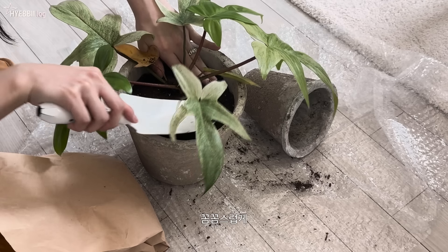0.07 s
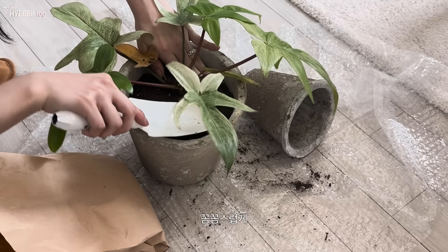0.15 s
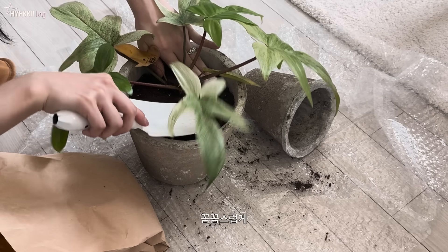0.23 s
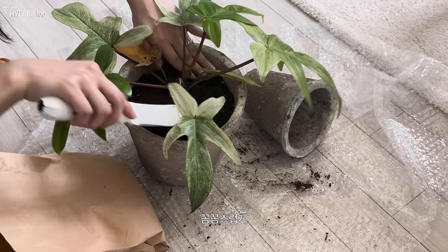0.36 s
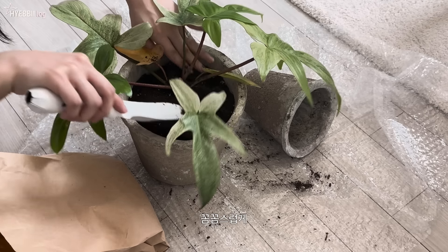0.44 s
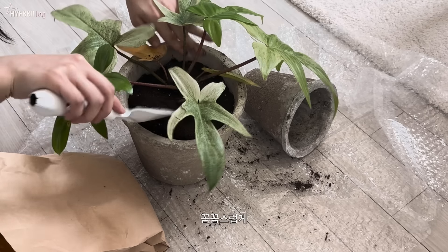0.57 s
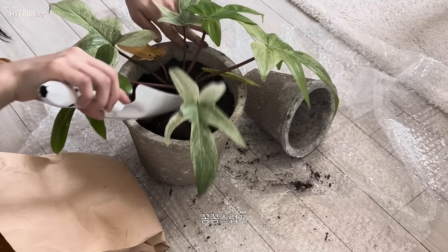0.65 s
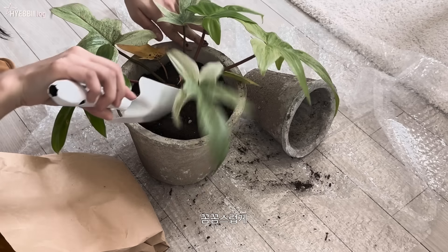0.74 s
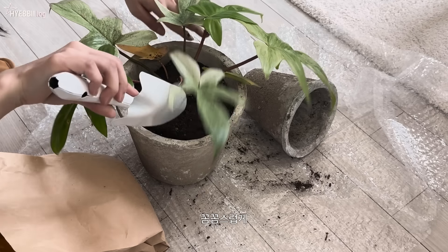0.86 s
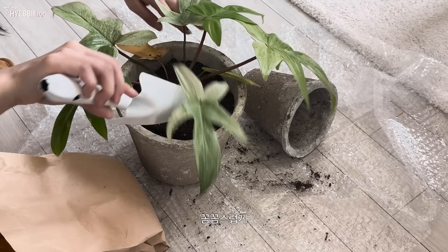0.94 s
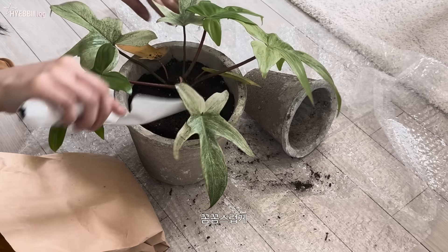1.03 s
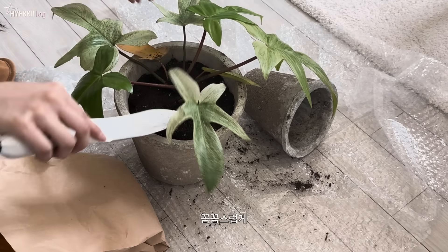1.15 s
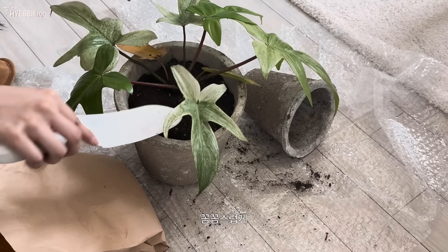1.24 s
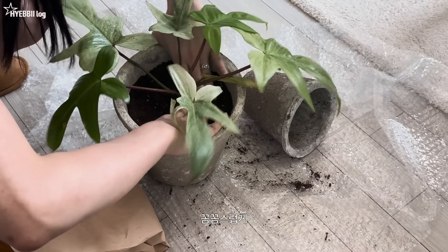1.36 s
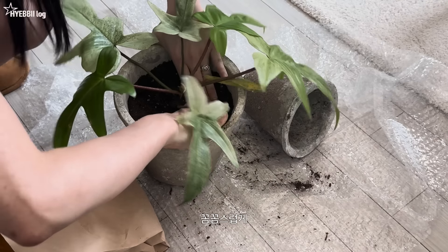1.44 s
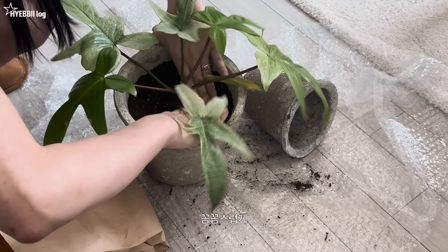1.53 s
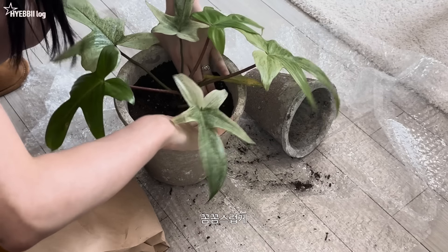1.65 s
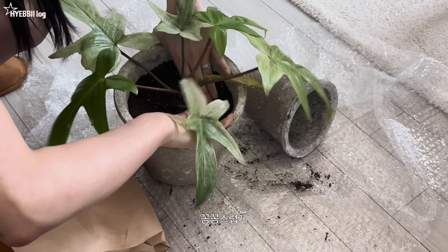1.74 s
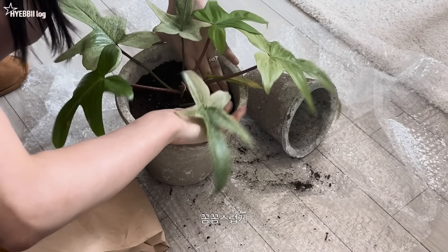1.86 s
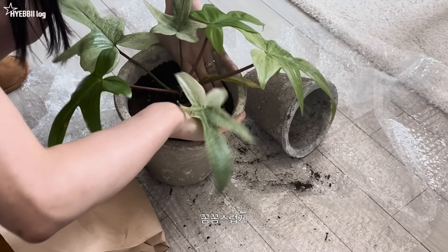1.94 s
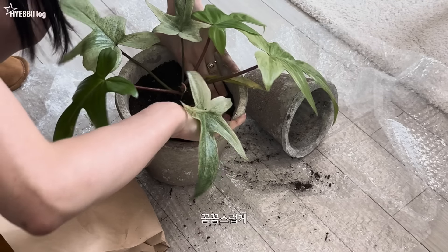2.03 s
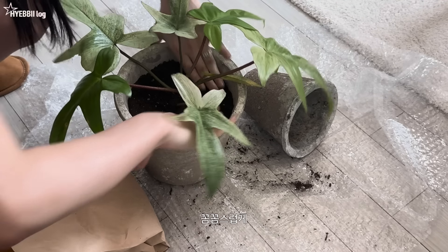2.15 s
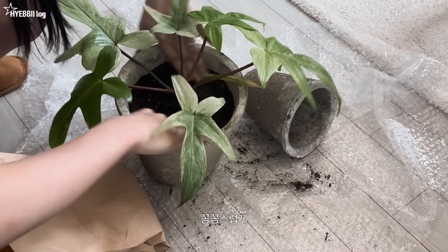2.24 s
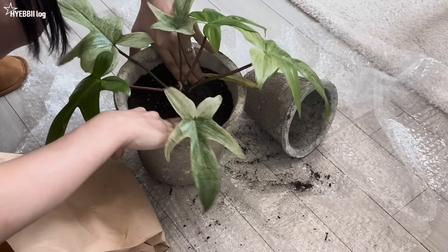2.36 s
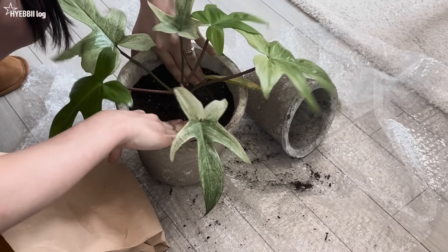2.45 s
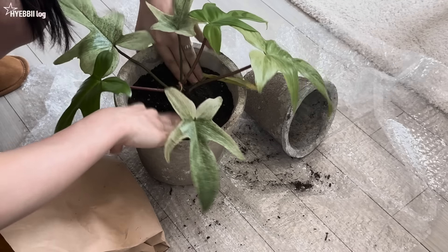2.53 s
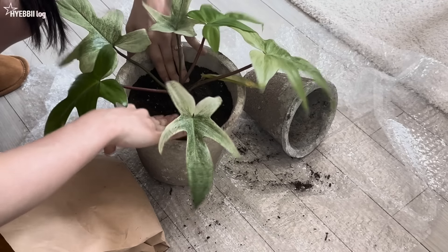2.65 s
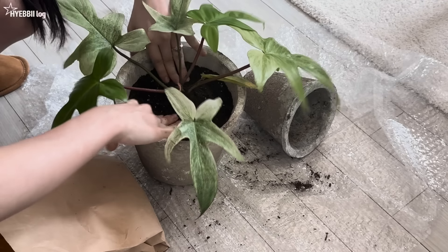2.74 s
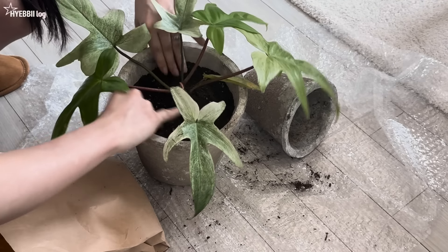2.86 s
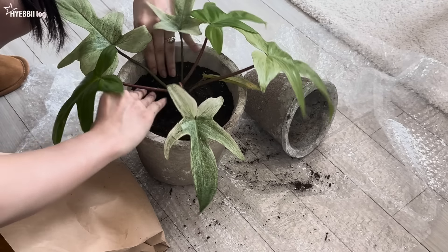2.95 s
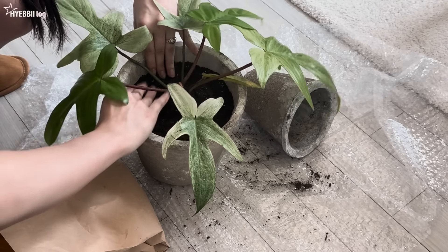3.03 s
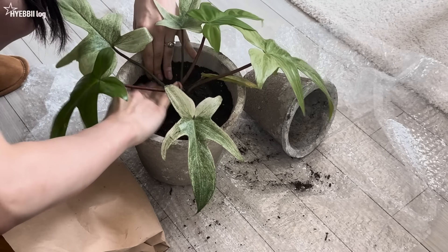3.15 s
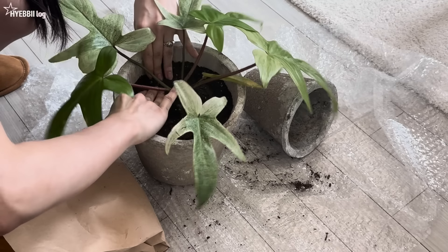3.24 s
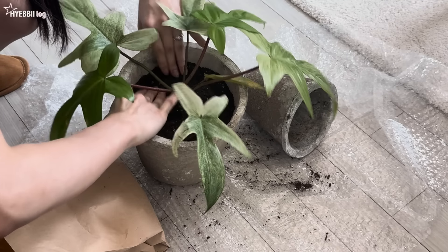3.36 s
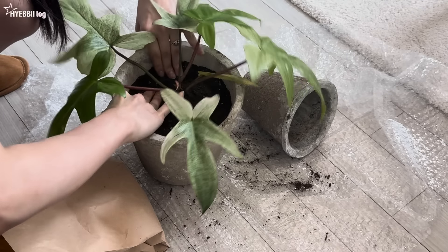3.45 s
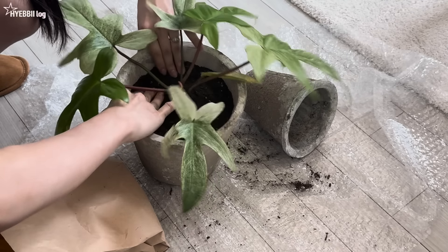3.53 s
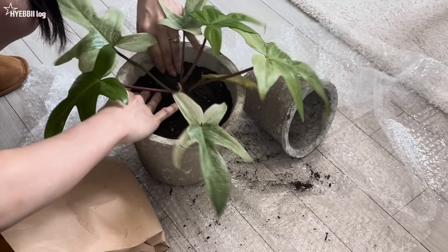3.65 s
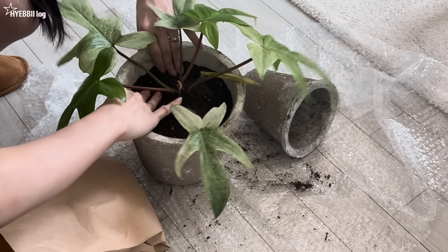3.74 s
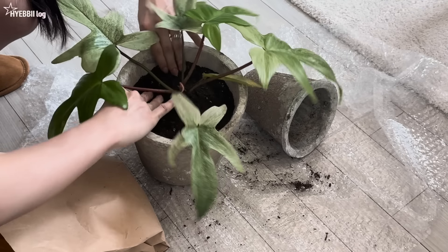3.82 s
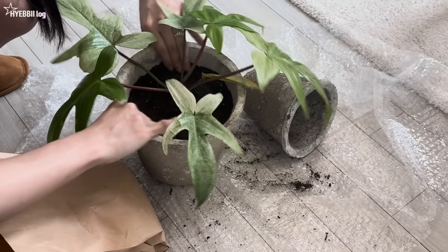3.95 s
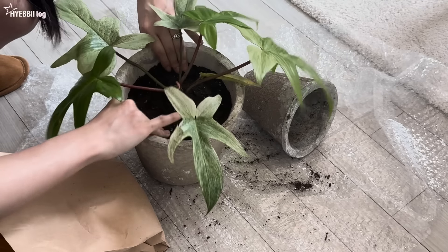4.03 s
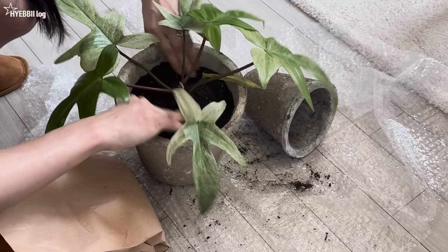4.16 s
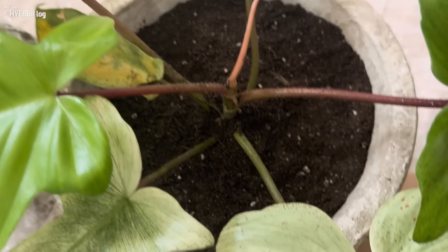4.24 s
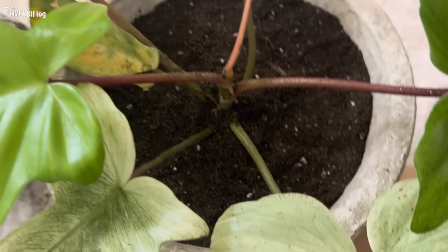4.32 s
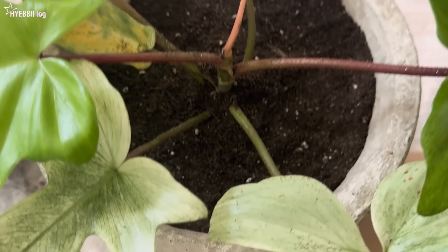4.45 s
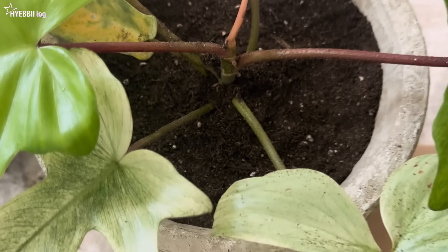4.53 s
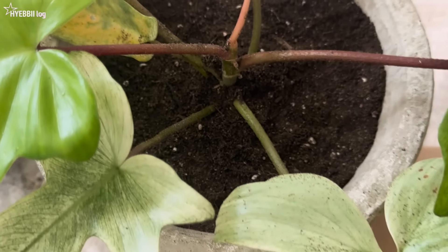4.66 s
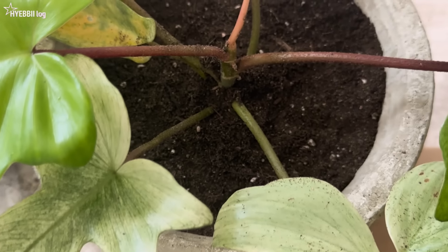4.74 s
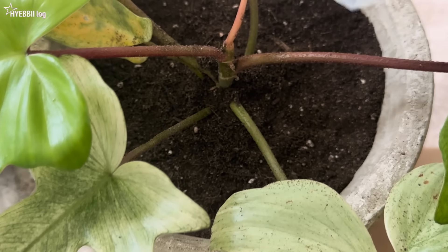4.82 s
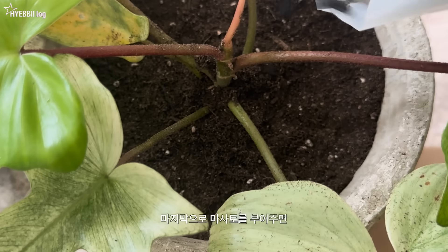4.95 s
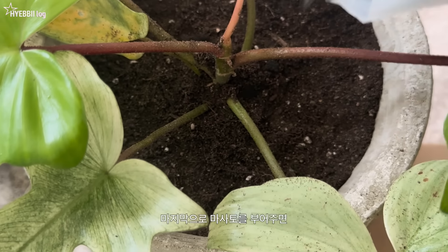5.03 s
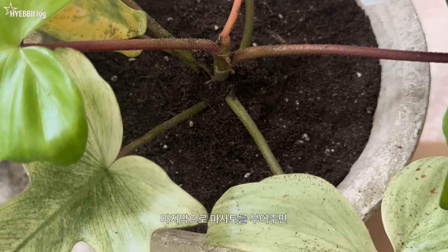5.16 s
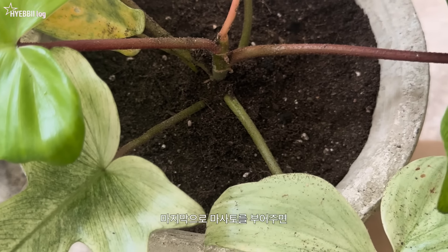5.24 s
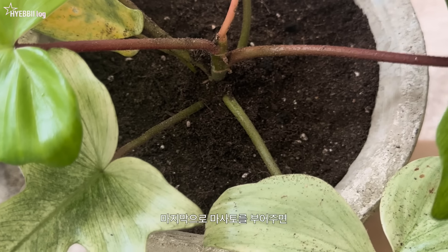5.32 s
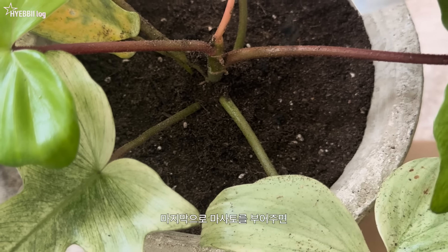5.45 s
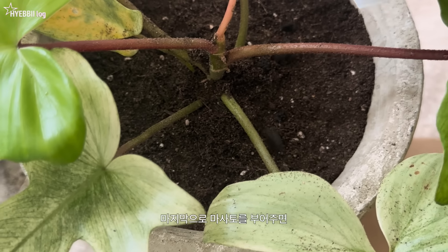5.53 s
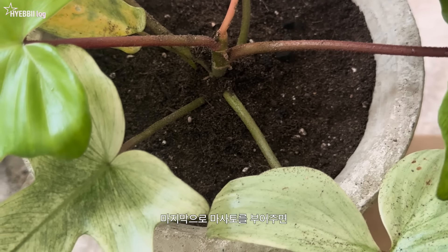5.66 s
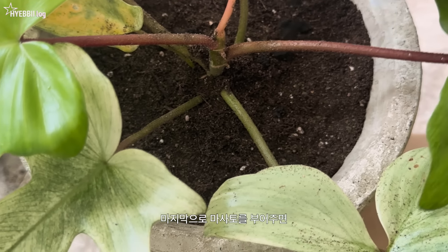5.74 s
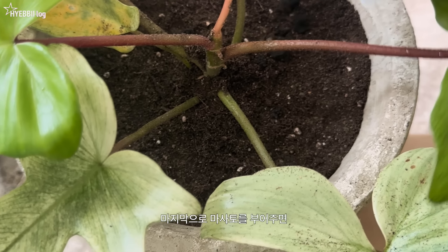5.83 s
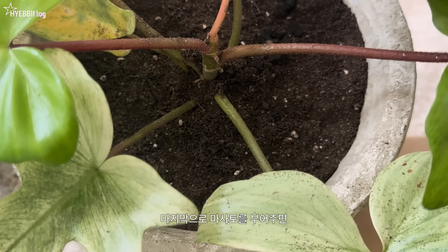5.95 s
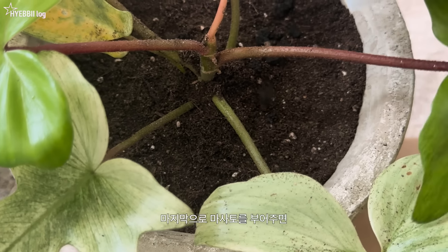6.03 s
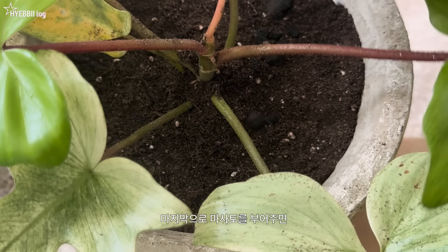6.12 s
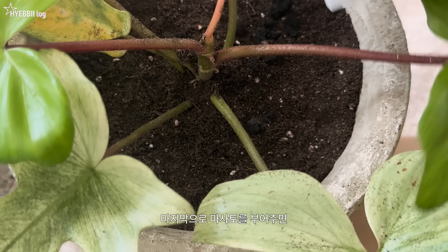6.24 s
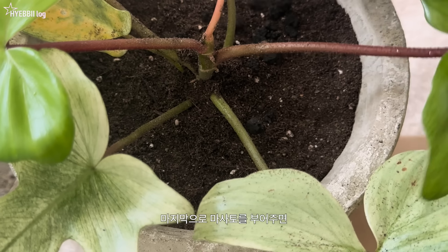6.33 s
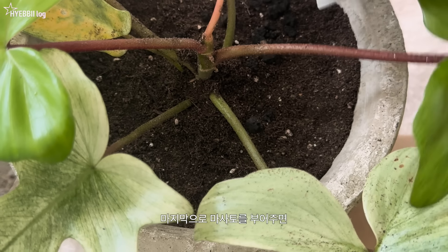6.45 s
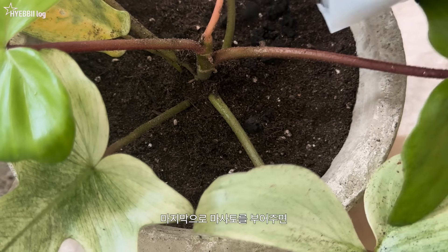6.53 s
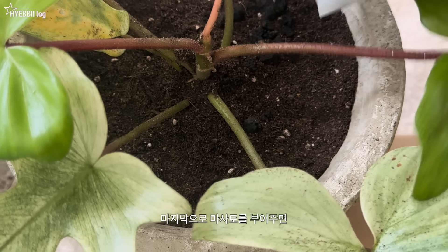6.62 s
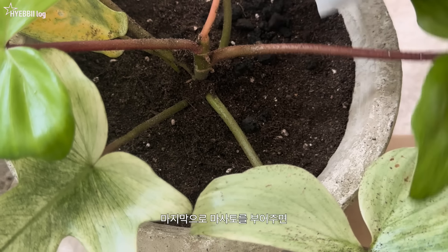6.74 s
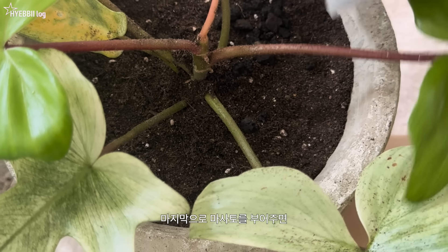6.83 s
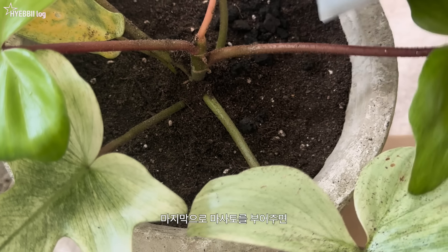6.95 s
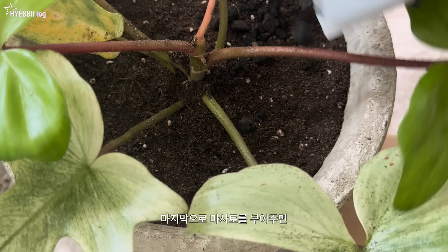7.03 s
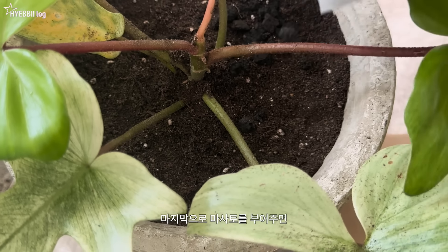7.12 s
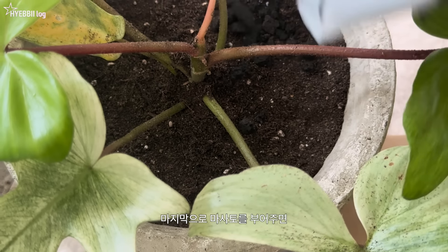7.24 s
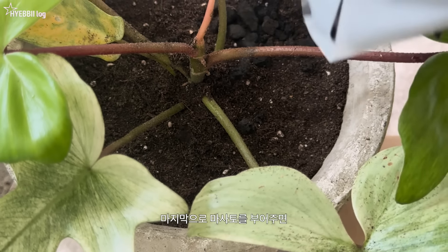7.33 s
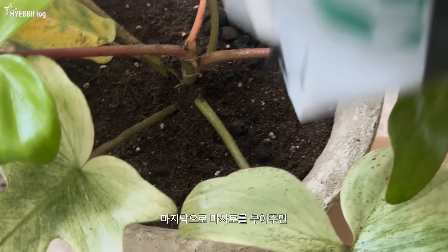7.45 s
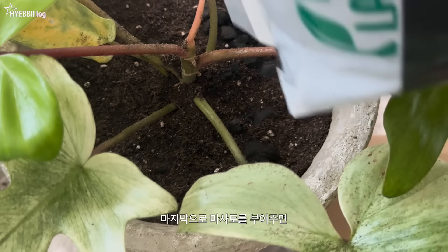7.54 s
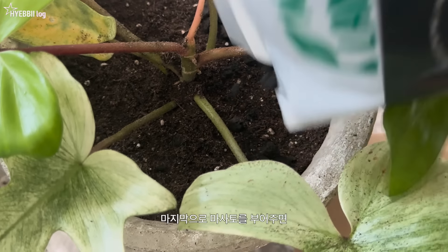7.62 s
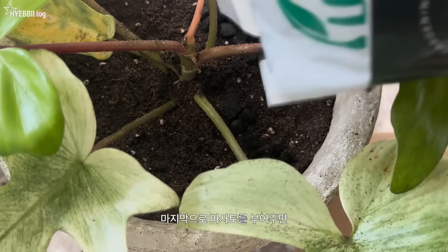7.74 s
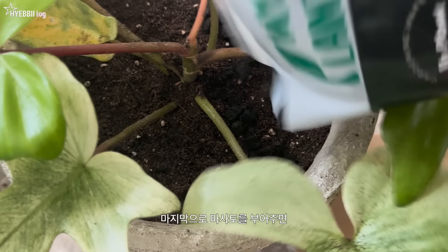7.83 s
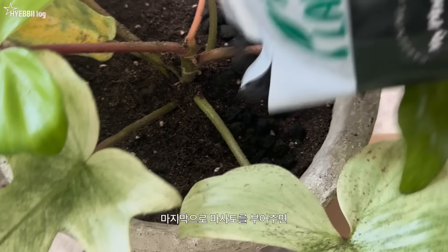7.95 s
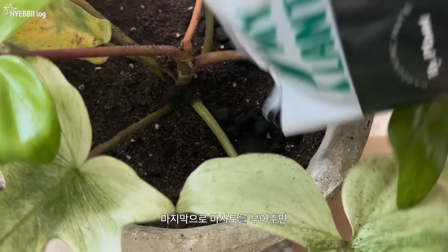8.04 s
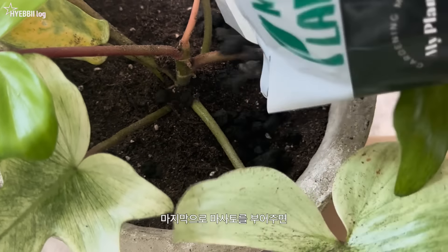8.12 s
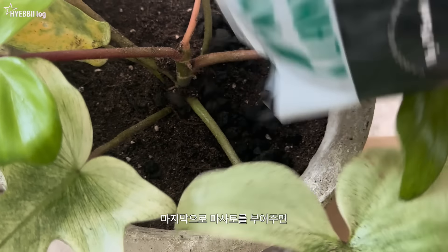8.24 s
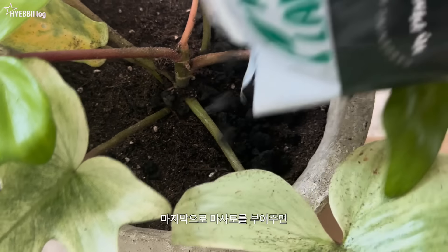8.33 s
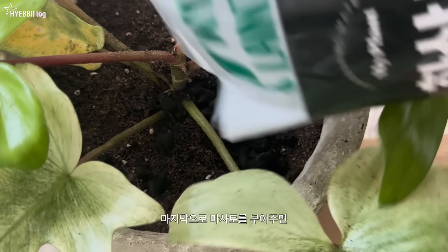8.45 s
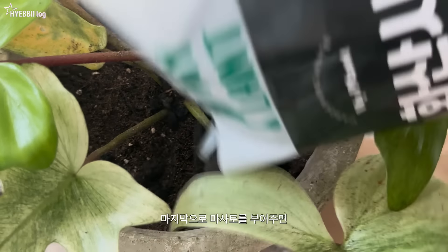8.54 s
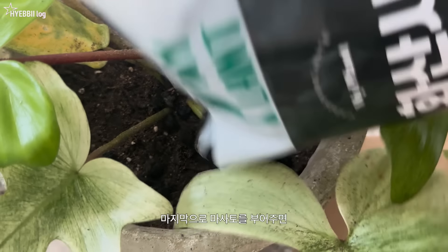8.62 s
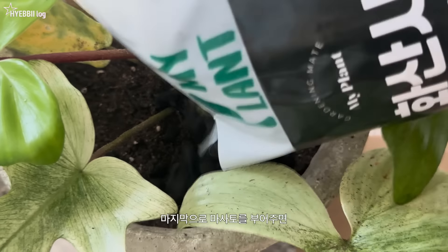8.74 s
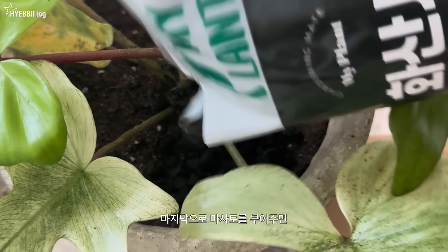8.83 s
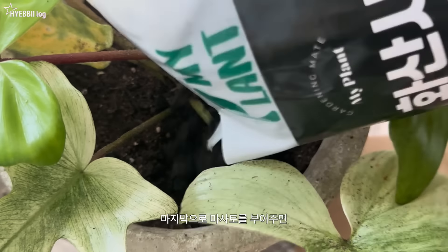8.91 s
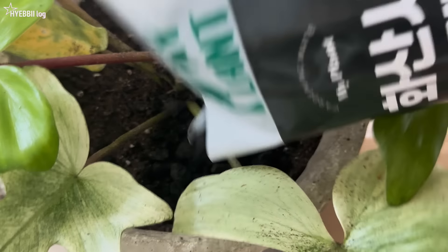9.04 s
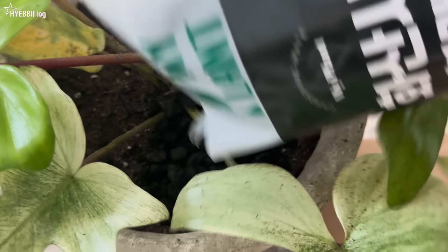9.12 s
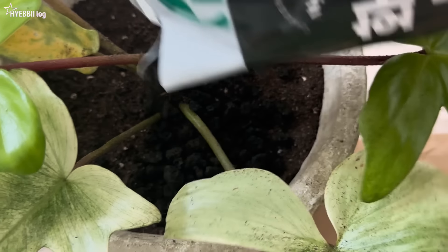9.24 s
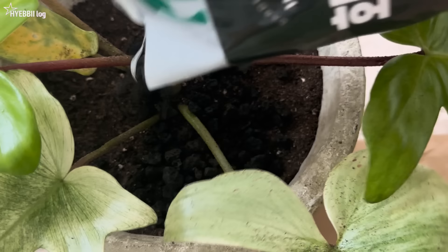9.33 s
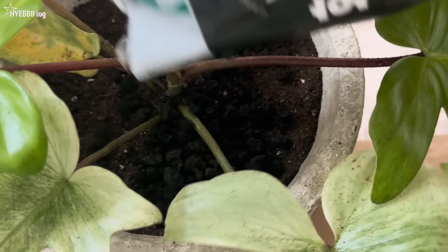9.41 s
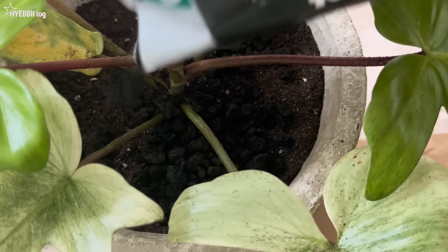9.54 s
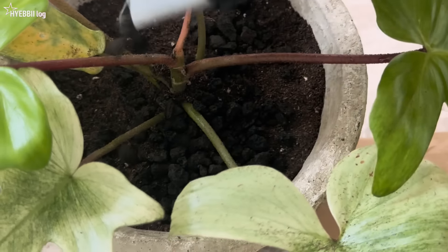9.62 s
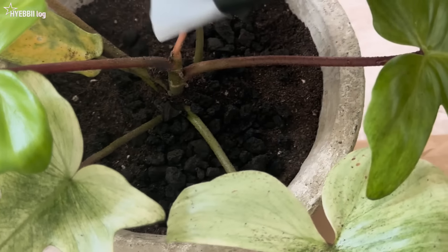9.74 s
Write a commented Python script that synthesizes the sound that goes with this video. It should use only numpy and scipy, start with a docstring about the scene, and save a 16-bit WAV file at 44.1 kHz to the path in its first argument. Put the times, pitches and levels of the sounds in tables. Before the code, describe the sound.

Soil scrapes faintly off a singing metal scoop, fingers press and crackle it, then grit pours from a bag in dense rattling gushes over low hum.

```python
"""Repotting on the floor

Indoors, close to a phone, soil slides off a steel scoop and makes it sing; fingers press it down in a stone pot.
Then grit is shaken from a plastic bag: many small grains patter, boom and hiss in gushes, and big ones knock.
Short bright bursts of noise break out within the pouring, and the pot rings and thuds.
A fan hums as wavering tones over a murmur of air. The two microphone ports hear the treble out of step."""
import sys
import numpy as np
from scipy import signal
from scipy.fft import rfft, irfft, next_fast_len
from scipy.io import wavfile
from scipy.ndimage import uniform_filter1d, map_coordinates

SR = 44100
rng = np.random.default_rng(int(sys.argv[2]) if len(sys.argv) > 2 else 0)


def unload_wav(signal):
    """Save mono or channel-first audio to the path in sys.argv[1] as 16-bit WAV at rate SR, clipped to [-1, 1]."""
    wavfile.write(
        sys.argv[1],
        SR,
        np.round(np.clip(np.atleast_2d(signal).T, -1, 1) * 32767).astype(np.int16),
    )


N = 431298


def amp(db):
    """Turn dB into a plain factor."""
    return 10 ** (np.asarray(db) / 20)


def unit(x):
    """Scale x to rms 1."""
    return x / np.sqrt(np.mean(x ** 2) + 1e-20)


def along(points, hz):
    """Read a curve of (f/Hz, value) points, with frequency on a log axis."""
    f, v = np.transpose(points)
    return np.interp(np.log(hz + 1), np.log(f + 1), v)


def curves(rows):
    """A gate that is open inside the table's time span, then one value per sample for each column."""
    s, *columns = np.transpose(rows)
    t = np.arange(N) / SR
    inside = 1.0 * ((t >= s[0]) & (t <= s[-1]))
    gate = uniform_filter1d(inside, size=300)
    return [gate] + [np.interp(t, s, column) for column in columns]


def wobble(rate):
    """A smooth random curve through `rate` random points a second."""
    points = rng.standard_normal(int(N * rate / SR) + 4)
    return map_coordinates(points, [np.arange(N) * rate / SR])


def swells(rows, fall):
    """Power of smooth bumps (peak t/s, length/s at half amplitude, level/dB); each falls `fall` times as long as it rises."""
    t = np.arange(0, N, 64) / SR
    s, length, db = np.array(list(rows)).T[:, :, None]
    u = (t - s) / length * (1 + fall) * np.where(t > s, 1 / fall, 1)
    power = amp(2 * db - 12 * u ** 2).sum(axis=0)
    return np.interp(np.arange(N) / SR, t, power)


def filtered(x, response):
    """Multiply the spectrum of x by a response, a function of frequency."""
    m = next_fast_len(N + SR // 2)
    return irfft(rfft(x, m) * response(np.fft.rfftfreq(m, 1 / SR)), m)[..., :N]


def coloured(x, spectrum):
    """x shaped by (f/Hz, level/dB) points, then set to rms 1."""
    return unit(filtered(x, lambda hz: amp(along(spectrum, hz))))


def modes(x, table):
    """Pass x through resonances (f/Hz, width/Hz, level/dB) that add up with alternating sign."""
    def response(f):
        total = 0
        for k, (centre, width, db) in enumerate(table):
            damping = 1j * f * width
            total = total + (-1) ** k * amp(db) * damping / (centre * centre - f * f + damping)
        return total
    return filtered(x, response)


def grains(start, end, lo_hz, hi_hz, cycles, spread_db, smooth, count, size):
    """Many tiny damped waves of random pitch and strength, mixed with a share `smooth` of steady noise."""
    when, pitch, big, sign = rng.random((count, 4)).T[:, :, None]
    hz = lo_hz * (hi_hz / lo_hz) ** pitch
    n = np.arange(size)
    # A wave has lost 30 dB after `cycles` cycles; the factor hz keeps the spectrum flat.
    strength = hz * amp(-spread_db * np.log(1.002 - big) - 30 * n * hz / SR / cycles)
    wave = strength * np.sign(sign - .5) * np.sin(2 * np.pi * hz * n / SR)
    at = ((start + (end - start) * when) * SR).astype(int) + n
    rain = np.bincount(at.ravel(), wave.ravel(), N + SR)[:N]
    share = np.clip(smooth, 0, 1)
    separate = unit(rain) * np.sqrt((end - start) * SR / N * (1 - share))
    return separate + np.sqrt(share) * rng.standard_normal(N)


def add_at(track, s, sound):
    """Add a short sound to the track from time s on."""
    track[round(s * SR):][:len(sound)] += sound


def knocks(rows, partials, cycles, body_db, crack_db, crack_t60, crack_hz):
    """Each row is a short dead ring at its pitch, with a dull crack of noise on its front."""
    bodies, cracks, t = np.zeros(N + SR), np.zeros(N + SR), np.arange(2000) / SR
    for s, db, hz, rel_db in rows:
        ring = sum(amp(level) * np.sin(2 * np.pi * k * hz * t) for k, level in partials)
        fade = amp(db + body_db - 30 * t * hz / cycles)
        onset = 1 - np.exp(-3 * t * hz)
        add_at(bodies, s, fade * onset * ring)
        crack_fade = amp(db + rel_db + crack_db - 60 * t / crack_t60)
        add_at(cracks, s, crack_fade * rng.standard_normal(len(t)))
    return bodies[:N] + filtered(cracks[:N], lambda hz: 1 / (1 + 1j * hz / crack_hz) ** 2)


def ports(x, alike, size):
    """What both ports share, plus an unshared part whose phases are scrambled by scattering."""
    z = signal.stft(x, nperseg=size)[2]
    scrambled = z * np.exp(2j * np.pi * rng.random(z.shape))
    other = signal.istft(scrambled, nperseg=size)[1][:N]
    other = unit(other) * np.std(x)

    def shares(hz):
        turn = np.arccos(np.clip(along(alike, hz), 0, 1)) / 2
        return np.array([np.cos(turn), np.sin(turn)])
    mid, side = filtered(np.array([x, other]), shares)
    return np.array([mid + side, mid - side])


# Level of the hum, with its random wavering: t/s, level/dB
HUM_LEVEL = [(0.0, -31.5), (0.63, -32.5), (1.03, -29), (1.36, -32.5), (2.37, -34), (2.56, -32.5),
             (4.03, -34), (4.22, -31), (4.9, -28), (5.01, -31), (6.32, -28.5), (6.62, -31.5), (7.9, -28),
             (8.04, -24.5), (8.85, -29), (9.04, -36), (9.53, -26), (9.78, -29)]
# Fan and duct tones: f/Hz, wander/Hz, level/dB relative to the hum's level
HUM_TONES = [(61.5, 1.6, 1.5), (148.5, 1.2, -6.5), (369.7, 4, -15), (918, 12, -26)]
# Colour of the air's murmur: f/Hz, level/dB
AIR_COLOUR = [(30, -46), (50, 0), (100, -8), (200, -14.5), (400, -19), (700, -24), (1100, -24.5),
              (1600, -32), (2500, -47.5), (5000, -61), (9000, -49), (12000, -60), (16000, -64)]
LOUDER_S = 4.25  # from here on the air is louder


def room():
    """Wavering fan and duct tones and a low rumble over the murmur of air, which is louder from LOUDER_S on."""
    _, hum_db = curves(HUM_LEVEL)
    tones = 0
    for hz, wander, db in HUM_TONES:
        level = amp(db + 1.6 * wobble(5))
        phase = 2 * np.pi * np.cumsum(hz + wander * wobble(6)) / SR
        tones = tones + level * np.sin(phase)
    rumble = modes(rng.standard_normal(N), [(58.0, 18, 0)])
    rumble = unit(modes(rumble, [(58.7, 24, 0)]))
    air = coloured(rng.standard_normal(N), AIR_COLOUR) * amp(0.25 * wobble(2.7))
    air_db = np.where(np.arange(N) > LOUDER_S * SR, -31, -35)
    return amp(hum_db) * (tones + amp(-14.5) * rumble) + amp(air_db) * air


# Pot and bag bump, lumps boom in the hollow: t/s, level/dB, f/Hz
THUD_HITS = [(3.488, -13.5, 114), (4.081, -8, 112), (4.531, -13, 165), (4.696, -2, 413), (4.708, -12, 110),
             (4.82, -4, 420), (4.913, -12, 145), (5.013, -8, 425), (5.355, -4, 420), (5.372, -10, 263),
             (5.385, -8, 177), (5.449, -14, 110), (5.468, -9, 204), (5.622, -11, 170), (5.665, -6, 430),
             (5.775, -6, 455), (5.776, -11, 204), (5.806, -12, 150), (5.873, -6.5, 95), (5.9, -3, 400),
             (5.954, -7, 165), (6.031, -9, 420), (6.096, -15, 190), (6.18, -6.5, 95), (6.263, -10, 100),
             (6.319, -5, 226), (6.339, -6, 340), (6.459, -9, 440), (6.49, -5, 500), (6.512, -6, 120),
             (6.818, -12, 209), (6.89, -9, 140), (7.036, -8, 160), (7.301, -7, 500), (7.818, -14, 120),
             (8.582, -6, 490), (8.932, -4, 390), (9.097, -10.5, 160), (9.141, -10, 510), (9.728, -13, 440)]
THUD_CYCLES = 7.9  # cycles until a bump has lost 60 dB


def thuds():
    """Bumps of the pot, bag and lumps are low tones that die within a few cycles."""
    out, t = np.zeros(N + SR), np.arange(SR // 4) / SR
    for s, db, hz in THUD_HITS:
        fade = amp(db - 60 * t * hz / THUD_CYCLES)
        onset = 1 - np.exp(-2.5 * t * hz)
        add_at(out, s, fade * np.sin(2 * np.pi * hz * t) * onset)
    return out[:N]


# The pot is touched: t/s, level/dB, extra level/dB of the modes above 3000 Hz
POT_TOUCHES = [(1.812, -55, 4), (1.8562, -29.5, 0.5), (1.885, -37, -8), (2.134, -45, -2), (2.146, -45, -2),
               (2.165, -43.5, -6), (2.339, -48, -10), (2.675, -52, -10), (3.465, -50, -12),
               (3.528, -52, -12), (3.555, -50, -12), (3.748, -53, -12), (3.798, -53, -12)]
# Ringing modes of the stone wall: f/Hz, level/dB, time to fall 60 dB/s
POT_MODES = [(1390, -16, .1), (1465, 0, 0.2), (1590, -9, .08), (2330, -11, 0.12), (2590, -3.5, 0.31),
             (2810, -3.5, 0.25), (3520, -10, .04), (3860, -6, .04), (4020, -0.5, 0.1), (4230, -9, 0.028)]


def clinks():
    """Each touch rings the stone wall roughly, with every mode at a new strength."""
    out, t = np.zeros(N + SR), np.arange(SR // 4) / SR
    front = (1 - np.exp(-t / 0.0018)) * (1 + 2.0 * np.exp(-t / 0.0064))  # soft onset, strong start
    for s, db, upper_db in POT_TOUCHES:
        for hz, level, t60 in POT_MODES:
            drift = np.cumsum(rng.normal(0, 0.085, len(t)))  # the coarse wall blurs each mode
            strength_db = db + level + upper_db * (hz > 3000) + rng.normal(0, 1.0)
            add_at(out, s, amp(strength_db - 60 * t / t60) * np.sin(2 * np.pi * hz * t + drift) * front)
    return out[:N]


# Soil slides along the blade: peak t/s, length/s, hiss level/dB, then the level/dB of each of five voices
SOIL_SLIDES = [(0.176, 0.06, -57, -34, -36, -31, -34, -40), (0.311, 0.086, -54, -27, -22, -29, -26, -34),
               (0.62, 0.25, -59, -46, -52, -43, -51, -50), (0.71, 0.11, -63, -30, -42, -35, -33, -42),
               (0.79, 0.1, -66, -34, -44, -35, -44, -45), (0.955, 0.065, -65, -25, -29, -32, -35, -17),
               (1.085, 0.09, -56, -46, -46, -31, -42, -42)]
# Resonances of the steel blade: f/Hz, width/Hz, level/dB
BLADE_MODES = [(750, 60, -6), (1440, 36, -10), (2712, 20, -2), (3705, 26, -3), (3915, 18, 2),
               (4270, 37, -15), (4840, 32, -17), (5450, 60, -18), (5640, 20, -13), (6095, 50, -9),
               (6580, 32, -8), (7205, 45, -11), (8400, 44, -16), (9400, 60, -11), (9800, 230, -8),
               (10600, 80, -11), (12000, 100, -11), (12900, 100, -10), (14000, 90, -6), (14900, 100, -12)]
# Where one voice of the blade ends and the next begins: f/Hz
VOICE_EDGES = [3000, 3800, 5000]
LOWEST_HZ = 2000  # modes under this follow the last voice
# Colour of crumbling soil, for the scoop and the fingers: f/Hz, level/dB
SOIL_COLOUR = [(800, -30), (1500, -6), (2600, -1), (4000, -3), (5500, -4), (7000, -2), (9000, 1),
               (10500, -3), (11500, -10), (13000, -9), (15500, -9)]


def scoop():
    """Sliding soil makes the blade sing, each mode coming and going, its pitch bent by the load; it hisses a little."""
    slides = np.array(SOIL_SLIDES)
    hiss, *voices = (np.sqrt(swells(slides[:, [0, 1, k]], fall=1.2)) for k in range(2, 8))
    rub = grains(0, 1.4, 600, 16000, cycles=1.3, spread_db=3.0, smooth=0.65, count=4000, size=120)
    rub = rub * amp(2.3 * wobble(30))
    sing = 0
    for mode in BLADE_MODES:
        hz = mode[0]
        voice = voices[-1 if hz < LOWEST_HZ else np.searchsorted(VOICE_EDGES, hz)]
        waver_db = 1.2 * wobble(9) + 2.5 * wobble(35)
        sing = sing + modes(voice * amp(waver_db) * rub, [mode])
    bent = map_coordinates(sing, [np.arange(N) + 5 * wobble(9)])  # reading early or late bends the pitch
    return bent + hiss * coloured(rub, SOIL_COLOUR)


# Hands moving in the soil: t/s, crumbling level/dB
HAND_MOVES = [(1.375, -54), (1.5, -58), (1.9, -52), (2.3, -53.5), (2.9, -57), (3.03, -64), (3.2, -51.5),
              (3.3, -66), (3.4, -47), (3.65, -49.5), (3.9, -54.5), (4.26, -70)]
# Fingers push down: peak t/s, length/s, level/dB
FINGER_PRESSES = [(1.395, 0.096, -50.5), (1.577, .1, -53), (1.642, 0.039, -50.5), (1.777, 0.045, -50.5),
                  (1.875, 0.047, -43), (2.155, 0.068, -47.5), (2.42, 0.032, -45), (2.53, 0.06, -48),
                  (2.69, 0.084, -47), (2.78, 0.05, -48), (3.48, 0.1, -47.5), (3.508, 0.031, -43),
                  (3.743, 0.16, -47), (3.8, 0.021, -45), (3.987, 0.17, -50.5), (4.12, 0.1, -50)]
# Crumbs that snap, and at 1.8587 s the sharp strike on the pot: t/s, level/dB, f/Hz, crack level/dB relative to
# the ring
CRUMB_SNAPS = [(0.655, -32, 3880, -13), (1.0555, -33, 5530, -9), (1.378, -24, 3590, -13),
               (1.531, -26, 3620, -26), (1.8122, -23, 3980, -12), (1.8587, -23, 3960, -33),
               (2.0457, -29, 5490, -27), (2.3395, -23, 2750, -18), (2.365, -26, 5200, -14),
               (2.418, -20, 3940, -22), (2.516, -29, 6500, -6), (2.5436, -21, 3540, -9),
               (2.6494, -19, 6070, -11), (2.6748, -32, 2810, -14), (2.699, -30, 5500, -8),
               (2.7252, -25, 1900, -20), (2.776, -26, 2400, -8), (3.3738, -25, 3010, -2),
               (3.4665, -32, 2640, -14), (3.5025, -21, 5960, -18), (3.505, -22, 4100, -22),
               (3.701, -25, 3600, -20), (3.709, -15, 6300, -17), (3.789, -22, 7000, -20),
               (3.7973, -12, 6350, -30), (3.801, -18, 6100, -30), (3.8628, -18, 6000, -14),
               (3.9537, -19, 5700, -20)]


def fingers():
    """Soil crumbles and snaps under pressing fingers."""
    on, moving_db = curves(HAND_MOVES)
    crumble = grains(1.36, 4.3, 1500, 16000, cycles=3, spread_db=2.6, smooth=.3, count=7000, size=120)
    effort = np.sqrt(amp(2 * moving_db) + swells(FINGER_PRESSES, fall=1.6))
    flutter_db = 0.87 * wobble(24.6) + 1.5 * wobble(60)
    crumble = on * effort * amp(flutter_db) * coloured(crumble, SOIL_COLOUR)
    ticks = knocks(CRUMB_SNAPS, [(1, 0)], cycles=10, body_db=-6, crack_db=2, crack_t60=0.006, crack_hz=15000)
    return crumble + ticks


# Short bright noise bursts within the pouring: t/s, level/dB, level/dB of the part up to 7200 Hz relative to the rest
BRIGHT_BURSTS = [(4.3336, -10.5, -9), (4.527, -5, -4), (4.735, -7, -2), (4.819, -11, -7), (5.2136, -11, -7),
                 (5.2401, -10, 1), (5.276, -9, -3), (5.8692, -5, 2), (5.9305, -6, -9), (6.0448, -10, -7),
                 (6.1201, -13, -6), (6.163, -4, 3), (6.2268, -7, -12), (6.3082, -6, -10), (6.5937, -8, 8),
                 (7.027, -9, -8), (7.12, -2, -12), (7.159, -10, 3), (7.2465, -9, -20), (7.275, -7, -16),
                 (7.7105, -8, -16), (7.7559, -7, -14), (8.145, -9, -17), (8.2915, -8, 3),
                 (8.3111, -13, -15), (8.4545, -9, -16), (8.4942, -12, -10), (8.784, -6, -17),
                 (9.0933, -14, -5), (9.457, -10, 6), (9.7563, -8, -16)]


def bright_bursts():
    """Bursts of noise a few milliseconds long, with a weaker or stronger part below the treble."""
    high, low, t = np.zeros(N + SR), np.zeros(N + SR), np.arange(300) / SR
    for s, db, low_db in BRIGHT_BURSTS:
        burst = amp(db - 60 * t / 0.0035) * rng.standard_normal(len(t))
        add_at(high, s, burst)
        add_at(low, s, amp(low_db) * burst)
    high = filtered(high[:N], lambda hz: hz > 7200)
    low = filtered(low[:N], lambda hz: (hz <= 7200) / (1 + (3000 / (hz + 1)) ** 4))
    return high + low


# Big grains land: t/s, level/dB, f/Hz, crack level/dB relative to the grain
STONE_HITS = [(4.309, -18, 3000, -12), (4.326, -15, 1500, -25), (4.4964, -17, 436, 3),
              (4.4966, -14, 1510, -18), (4.526, -4.5, 428, -2), (4.622, -14, 440, -4),
              (4.6222, -14, 1310, -20), (4.648, -9.5, 428, -19), (4.731, -3, 580, -13),
              (4.834, -6.5, 480, 0), (4.911, -13, 506, -12), (4.961, -11.5, 434, -9),
              (5.008, -11, 2280, -14), (5.028, -9.5, 2520, -4), (5.214, -17.5, 493, 7.5),
              (5.2427, -13, 1280, -5), (5.276, -14, 1280, -17), (5.34, -9, 510, -19), (5.432, -14, 404, -5),
              (5.494, -11, 1380, -18), (5.52, -7, 930, -23), (5.545, -6, 540, -27), (5.611, -7, 970, -15),
              (5.736, -10, 480, -6), (5.768, -4.5, 685, -1), (5.8, -7, 1580, -14), (5.947, -11, 1000, -10),
              (6.003, -10.5, 348, -15), (6.093, -10, 1310, -18), (6.271, -6, 510, -29),
              (6.4, -10, 483, -32), (6.477, -13, 1900, -20), (6.497, -12, 1420, -13),
              (6.5357, -8, 503, -12), (6.5359, -14, 1570, -20), (6.594, -4.5, 705, -5.5),
              (6.597, -1, 240, -30), (6.636, -15, 1330, -16), (6.7, -7, 573, -31), (6.746, -8.5, 430, -2),
              (6.7867, -13, 1450, -19), (6.847, -12, 563, -25), (6.871, -6, 445, -9), (6.913, -7, 436, -23),
              (6.964, -12, 528, -4), (7.027, -5.5, 380, -23), (7.07, -6.5, 460, -17.5),
              (7.1585, -11, 930, -7), (7.3564, -15, 1070, -2), (7.469, -15, 1770, -18),
              (7.5548, -1, 1450, -17), (7.567, -4.5, 1460, -21), (7.6695, -8, 1500, -20),
              (7.74, -9, 1410, -10), (7.79, -7, 1570, -25), (7.855, -6, 510, -12), (7.81, -16, 1500, -20),
              (8.014, -15, 611, -11), (8.062, -3, 1550, -22), (8.186, -8, 1410, -18),
              (8.221, -11, 706, -14), (8.3328, -3, 1400, -27), (8.3355, -5, 1590, -28),
              (8.428, -11, 1090, -22), (8.433, -3, 1200, -20), (8.568, -10, 1600, -20),
              (8.64, -11, 1590, -18), (8.725, -12, 630, -17), (8.778, -10, 940, -21),
              (8.837, -14, 990, -15), (8.946, -1.5, 905, -26), (9.0188, -12, 1930, -10),
              (9.036, -13, 2600, -10), (9.096, -4, 1470, -20), (9.079, -3, 636, -18),
              (9.084, -4, 1350, -22), (9.113, -14, 1650, -20), (9.281, -14, 1520, -16),
              (9.294, -17, 1800, -20), (9.308, -16, 1700, -20), (9.327, -8, 1540, -28),
              (9.343, -15, 2000, -13), (9.3675, -13, 1550, -18), (9.4568, -8, 1430, -3.5),
              (9.527, -17, 581, 6), (9.759, -12.5, 1840, -7)]
# A big grain's modes: multiple of its pitch, level/dB
STONE_MODES = [(1, 0), (1.36, -7), (1.72, -9), (.6, -7)]


def stones():
    """Big grains land with a short knock at their own pitch and a crack."""
    return knocks(STONE_HITS, STONE_MODES, cycles=8, body_db=-1.5, crack_db=8, crack_t60=.006, crack_hz=6000)


LOWERED_S = 8  # from here on the bag is lower and the pot fuller
# Colour of the pot's hollow: f/Hz, level/dB
HOLLOW_COLOUR = [(50, -10), (100, 0.5), (200, -3), (320, 0.5), (450, 4.5), (600, -2.5), (900, -48),
                 (1500, -12.5)]
# Colour of the fuller pot: f/Hz, level/dB
FULLER_COLOUR = [(50, -8), (100, 6), (150, -5.5), (300, -0.5), (450, 5), (620, 0.5), (900, -4.5),
                 (1500, -34)]


def boom(weight, spurts):
    """Falling grit makes the pot's hollow boom with many low, short thumps."""
    thumps = grains(4.2, 9.78, 109.7, 803, cycles=3.84, spread_db=1.5, smooth=0.59, count=3000, size=1500)
    lowered = np.arange(N) > LOWERED_S * SR
    tone = np.where(lowered, coloured(thumps, FULLER_COLOUR), coloured(thumps, HOLLOW_COLOUR))
    return weight * amp(1.2 * spurts + 0.75 * wobble(17)) * tone


# Colour of the hiss with the bag held at the rim: f/Hz, level/dB
RIM_HISS_COLOUR = [(1500, -30), (3000, -8), (5000, -5), (7000, -2), (8500, 1), (10500, -2.5), (12800, -14),
                   (15500, -8)]
# Colour of the hiss with the bag lowered over the soil: f/Hz, level/dB
LOW_HISS_COLOUR = [(1500, -30), (3000, -6), (5500, -4), (7500, -2), (9500, 1), (10500, -1), (11500, -9),
                   (13500, -7), (15500, -4)]
FULL_FLOW_DB, HISS_GROWS = -31.5, 0.73  # reference flow; a power below 1, so hiss swings less than patter


def hiss(flow, mouth_db, spurts):
    """Grit hisses through the bag's mouth as a fizz of very short, high grains."""
    fizz = grains(4.2, 9.78, 5200, 16700, cycles=1.7, spread_db=5.0, smooth=0.53, count=30000, size=40)
    lowered = np.arange(N) > LOWERED_S * SR
    tone = np.where(lowered, coloured(fizz, LOW_HISS_COLOUR), coloured(fizz, RIM_HISS_COLOUR))
    through = amp(FULL_FLOW_DB + mouth_db) * (flow / amp(FULL_FLOW_DB)) ** HISS_GROWS
    return through * amp(1.47 * spurts + 1.27 * wobble(24) + 1.37 * wobble(50)) * tone


# Colour of grit on soil: f/Hz, level/dB
ON_SOIL_COLOUR = [(350, 2), (650, 3), (780, -2.5), (950, 4), (1200, 1), (1450, 4), (1800, -1.5), (2080, 0),
                  (2400, -2.5), (3000, -3.5), (4500, -12.5), (7000, -50)]
# Colour of grit on grit: f/Hz, level/dB
ON_GRIT_COLOUR = [(350, -2.5), (650, 3), (780, -3), (950, 4.5), (1230, -1), (1520, 3.5), (2100, -2),
                  (3000, -4.5), (4500, -12.5), (7000, -50)]
COVERED_S = 8  # from here on grit falls on grit


def patter(flow, spurts):
    """Grit patters on the soil, later on grit, as thousands of short ringing grains."""
    pebbles = grains(4.2, 9.78, 500, 5000, cycles=7, spread_db=2.3, smooth=.2, count=9000, size=500)
    covered = np.arange(N) > COVERED_S * SR
    tone = np.where(covered, coloured(pebbles, ON_GRIT_COLOUR), coloured(pebbles, ON_SOIL_COLOUR))
    return flow * amp(spurts) * tone


# Grit trickling between shakes: t/s, patter level/dB, hiss level/dB over the patter at the reference flow
TRICKLE = [(4.2, -58, -13), (4.31, -40, 1), (4.45, -36, -2.5), (4.62, -29, -1), (4.95, -29, 2.5),
           (5.15, -41.5, 1), (5.35, -29, 0), (5.95, -28.5, 1), (6.2, -25.5, 1.5), (7.05, -26.5, 0.5),
           (7.25, -35.5, -0.5), (7.7, -31.5, 0), (8.0, -28, 0.5), (8.35, -32.5, 0.5), (9.05, -28, 0),
           (9.25, -37, 0.5), (9.45, -37, 1.5), (9.6, -30, 2.5), (9.78, -30.5, -1)]
TRICKLE_BOOM_DB = -3  # boom over patter in the trickle
# Each shake of the bag: peak t/s, length/s, patter level/dB, boom level/dB over the patter
SHAKES = [(4.365, 0.048, -29.5, -6.5), (4.526, 0.053, -40, 11), (4.775, 0.22, -23, -0.5),
          (4.877, 0.24, -28, -1), (5.259, 0.14, -30, -4), (5.371, 0.13, -21.5, 0.5), (5.485, 0.1, -27, 3.5),
          (5.64, 0.096, -26.5, 0), (5.774, 0.038, -23.5, 3.5), (5.896, 0.05, -30, 7),
          (6.06, 0.11, -28.5, 4), (6.166, 0.024, -24.5, -2), (6.328, 0.04, -25, 2),
          (6.44, 0.16, -28.5, 1.5), (6.569, 0.043, -26, 3.5), (6.737, 0.15, -29.5, 5),
          (6.871, 0.082, -23.5, 2), (6.968, 0.031, -22.5, 0), (7.038, 0.071, -23, -1),
          (7.149, 0.084, -30, 5), (7.294, 0.033, -24.5, -2), (7.383, 0.052, -29.5, 0.5),
          (7.488, 0.088, -24.5, 0.5), (7.65, 0.05, -26, -4), (7.823, 0.13, -21.5, -6),
          (8.041, 0.091, -23.5, -0.5), (8.211, 0.068, -23.5, -5.5), (8.403, 0.054, -25, -0.5),
          (8.573, 0.17, -23.5, -2.5), (8.743, 0.051, -24.5, -4.5), (8.928, 0.066, -22, -2.5),
          (9.115, 0.12, -21.5, -6), (9.298, 0.018, -30, -6), (9.375, 0.055, -31.5, -1),
          (9.551, 0.097, -25.5, -4), (9.729, 0.036, -29.5, 4.5)]
# The pouring dips briefly: t/s, level/dB
POUR_DIPS = [(4.32, -7), (4.342, -5), (5.595, -6), (5.83, -3), (5.975, -5.5), (6.37, -3.5), (6.522, -6),
             (6.77, -4.5), (7.15, -4), (7.545, -3), (8.175, -1.5), (8.445, -2)]
DIP_S = 0.0089  # from a dip's middle until 1/e of its depth is left


def pour():
    """Grit patters, booms and hisses, all in the same spurts, while big grains land."""
    on, trickle_db, mouth_db = curves(TRICKLE)
    s, length, db, hollow_db = np.transpose(SHAKES)
    flow = np.sqrt(amp(2 * trickle_db) + swells(zip(s, length, db), fall=1.1))
    boom_power = swells(zip(s, length, db + hollow_db), fall=1.46)
    weight = np.sqrt(amp(2 * (trickle_db + TRICKLE_BOOM_DB)) + boom_power)
    spurts = 0.55 * wobble(30) + 0.92 * wobble(70)  # dB
    t = np.arange(N) / SR
    dip_db = sum(depth * np.exp(-((t - middle) / DIP_S) ** 2) for middle, depth in POUR_DIPS)
    grit = patter(flow, spurts) + boom(weight, spurts) + hiss(flow, mouth_db, spurts)
    return on * amp(dip_db) * grit + stones()


# The bag crosses the pot: t/s, left over right level/dB
BAG_PATH = [(4.2, -1), (5.5, -.9), (7, -.4), (8.2, .3), (9.78, 1.1)]
# How alike the ports hear near sounds: f/Hz, likeness (1 = the same)
NEAR_LIKENESS = [(60, .9), (200, .87), (420, .94), (800, .82), (1400, .94), (1900, 1), (2400, 1),
                 (3400, .92), (5400, 1), (6600, 1), (7300, .85), (7700, .992), (9050, .992), (10500, .88),
                 (12500, .7), (15500, .86)]
# How alike the ports hear the room: f/Hz, likeness (1 = the same)
ROOM_LIKENESS = [(60, .97), (200, .9), (500, .5), (800, .3), (1200, .5), (2000, .97), (7700, .99),
                 (9000, .99), (16000, .8)]


def scene():
    """Room, hands and bag, each spread over the two ports."""
    _, pan_db = curves(BAG_PATH)
    background = ports(room(), ROOM_LIKENESS, size=4096) * amp([[.3], [-.3]])
    hands = ports(thuds() + clinks() + scoop() + fingers(), NEAR_LIKENESS, size=512) * amp([[.2], [-.2]])
    bag = ports(bright_bursts() + pour(), NEAR_LIKENESS, size=512) * amp([pan_db / 2, -pan_db / 2])
    return background + hands + bag


# How far the left port is ahead of the right: f/Hz, phase/radians
PORT_LEAD = [(0, 0), (500, -.05), (900, -.45), (1200, -.4), (1700, -.05), (2200, 0), (3200, .4), (4200, .3),
             (5200, 0), (6600, 0), (7000, .6), (7350, 1.5), (7700, 3.14), (9050, 3.14), (9900, 2.4),
             (11300, 2.25), (12700, 1.75), (15800, .75)]
TOP_HZ = 15850  # band limit


def record(dry):
    """The ports differ in phase; peaks are rounded off; the deepest bass fades and nothing passes the band limit."""
    lead = lambda hz: np.exp(.5j * along(PORT_LEAD, hz) * np.array([[1], [-1]]))
    x = filtered(dry, lead)
    x = x / (1 + np.abs(x) ** 6) ** (1 / 6)
    return filtered(x, lambda hz: (hz < TOP_HZ) / (1 + (36 / (hz + 1)) ** 6))


dry = scene()
out = record(dry)
unload_wav(out)
```